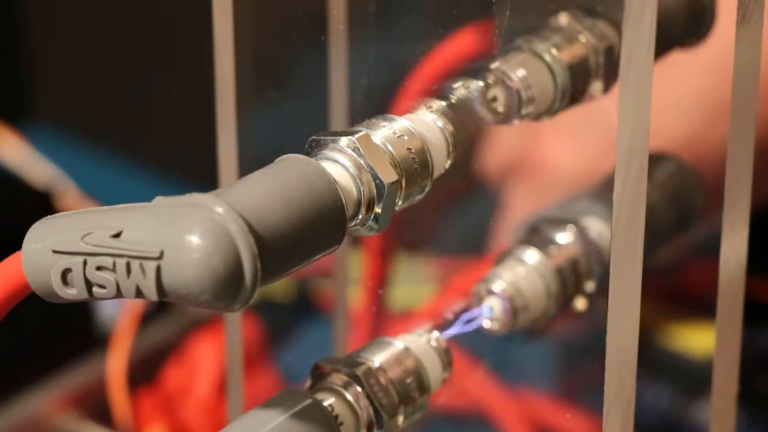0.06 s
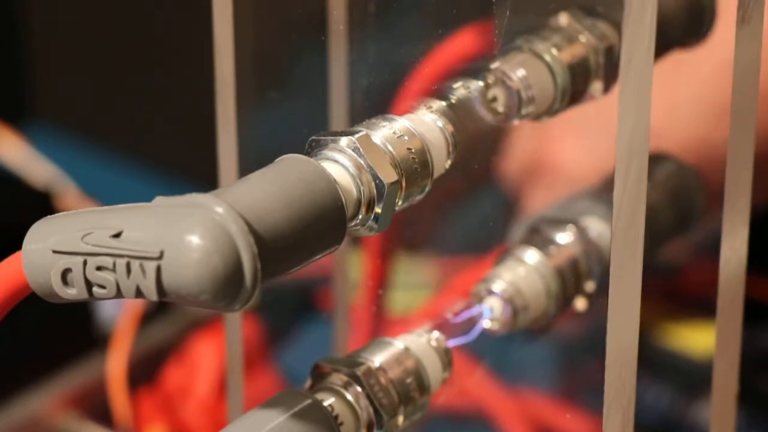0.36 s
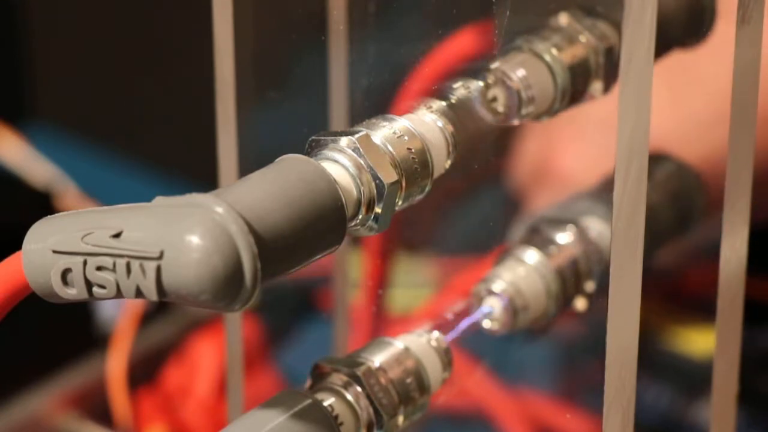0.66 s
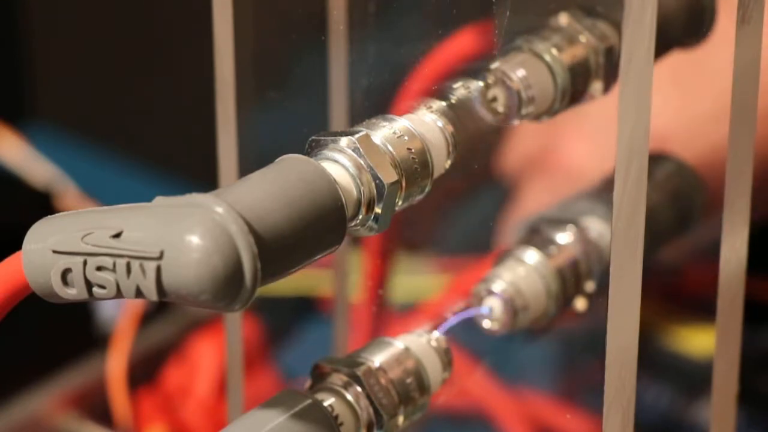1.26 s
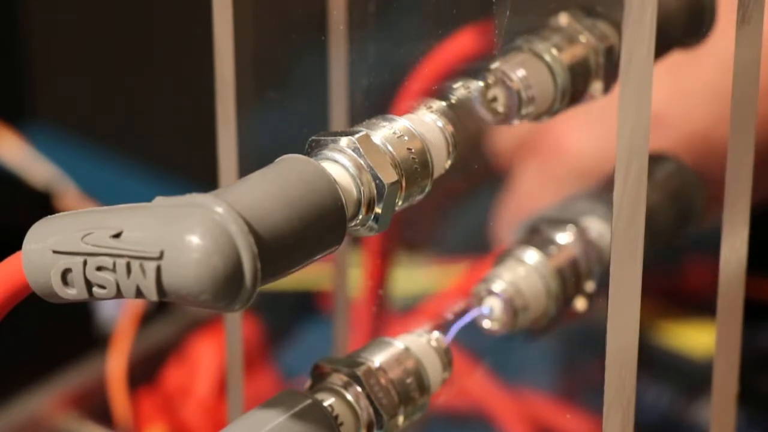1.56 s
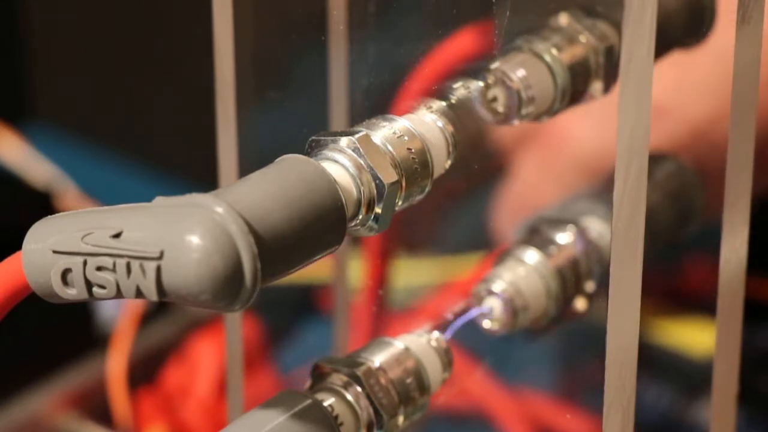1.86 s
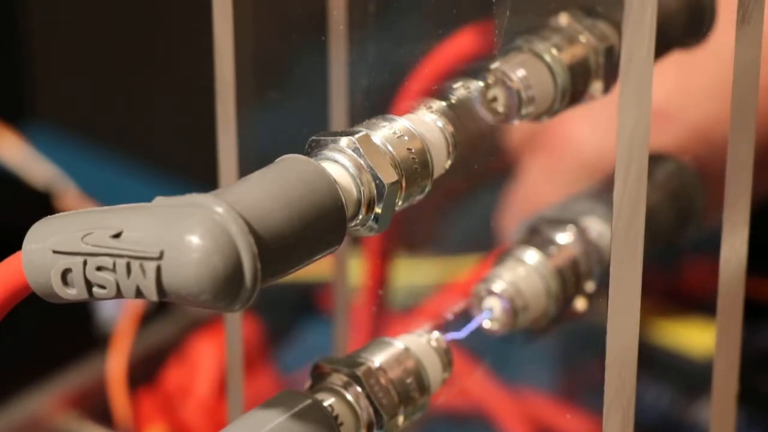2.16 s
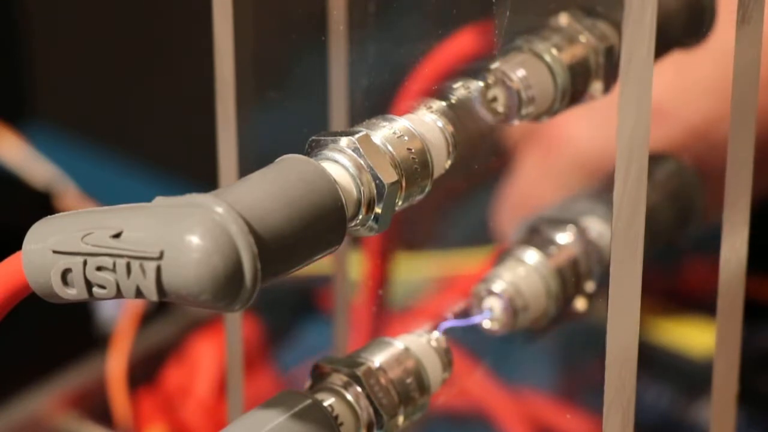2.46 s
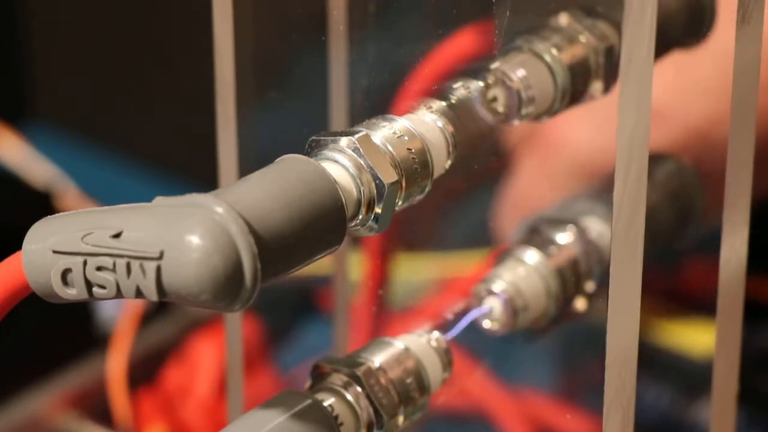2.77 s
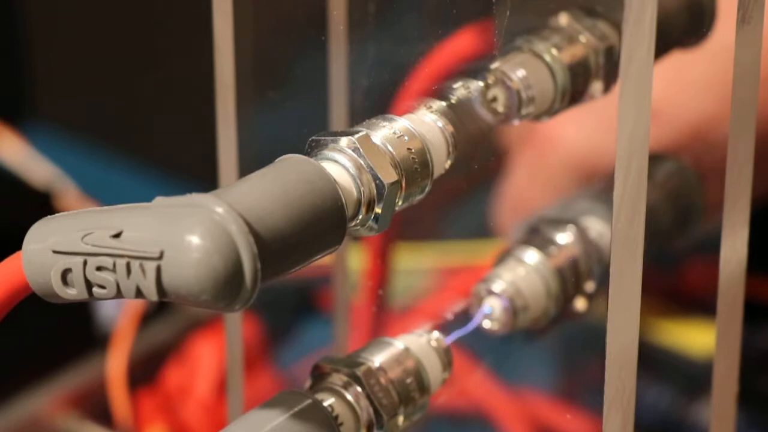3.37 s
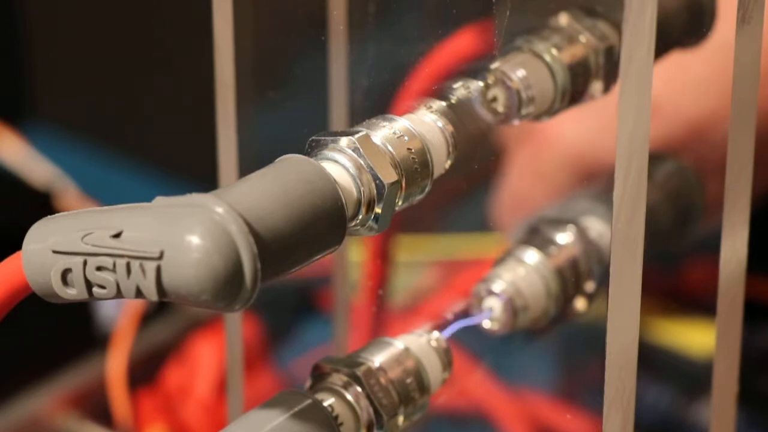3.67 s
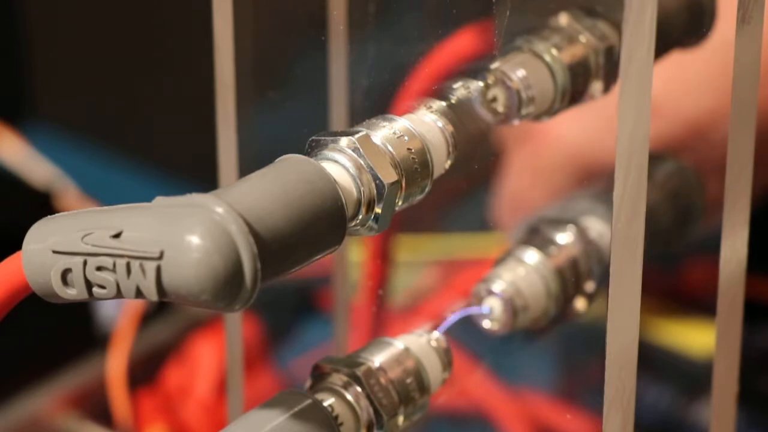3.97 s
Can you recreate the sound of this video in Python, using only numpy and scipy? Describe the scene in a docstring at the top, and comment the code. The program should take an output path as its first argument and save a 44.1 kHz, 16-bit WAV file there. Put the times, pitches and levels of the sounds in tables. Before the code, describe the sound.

A hard electric buzz of sharp, fast sparks comes from a spark plug on a test rig. Heard close and in stereo indoors, it keeps one pitch throughout, with some cracks slightly louder and very faint room noise underneath.

```python
"""A hard, crackling 50 Hz buzz: an ignition test rig firing a spark plug inside a clear plastic guard.
Each spark is one sharp shock; it reaches the close stereo microphone directly, then off the guard's
panels, then from the workshop. The arc takes a new path every time, so strength, brightness and
echoes vary. Faint room noise and the hum of the rig lie underneath."""
import sys
import numpy as np
from scipy import signal
from scipy.fft import rfft, irfft
from scipy.io import wavfile
from scipy.ndimage import uniform_filter1d

SR = 44100
rng = np.random.default_rng(int(sys.argv[2]) if len(sys.argv) > 2 else 0)


def to_wav(sig):
    """Store sig (one row per channel, or 1-D mono) as 16-bit WAV at the path in sys.argv[1].

    Samples outside -1..1 are clipped; the rate is SR.
    """
    pcm = np.clip(np.atleast_2d(sig), -1, 1) * 32767
    pcm = np.round(pcm).astype(np.int16)
    wavfile.write(sys.argv[1], SR, pcm.T)  # frames by channels


N = 176400
SPARK_RATE_HZ, FIRST_SPARK_S = 50.0004, .00368
RUN_IN_S = .5  # earlier sparks fill the reverberation
TRACK_SAMPLES = N + SR
FILTER_GRID_HZ = np.fft.rfftfreq(4096, 1 / SR)


def from_db(db):
    """Decibels to gain."""
    return 10 ** (np.asarray(db) / 20)


def db_at(table, hz, column=1):
    """One column of a spectrum table, interpolated over log frequency."""
    rows = np.array(table)
    return np.interp(np.log(hz + 1), np.log(rows[:, 0]), rows[:, column])


def minimum_phase(gain):
    """Causal impulse response with the given gains."""
    cepstrum = irfft(np.log(gain + 1e-9))
    half = len(cepstrum) // 2
    cepstrum[1:half] *= 2
    cepstrum[half + 1:] = 0
    return irfft(np.exp(rfft(cepstrum)))[:half]


def pulse_train(times, spectra, hz, lead_samples=128):
    """One short pulse per spectrum, timed between samples; the track starts with the run-in."""
    position = (times + RUN_IN_S) * SR
    offset = position % 1 + lead_samples
    pulses = irfft(spectra * np.exp(-2j * np.pi * hz * offset[:, None] / SR))
    track = np.zeros(TRACK_SAMPLES)
    for start, pulse in zip(position.astype(int) - lead_samples, pulses):
        track[start:start + len(pulse)] += pulse
    return track


# Workshop noise spectrum: (frequency [Hz], relative density [dB])
NOISE_SPECTRUM = [(20, -12), (50, -11), (100, -1), (160, -0.5), (350, 2), (700, -22), (3000, -33),
                  (16000, -35)]

def workshop_noise(mid_rms_db=-71.5, side_ratio_db=-10):
    """Low background noise, mostly common to both channels."""
    shape = from_db(db_at(NOISE_SPECTRUM, np.fft.rfftfreq(N, 1 / SR)))
    noise = irfft(rfft(rng.standard_normal((2, N))) * shape, N)
    mid, side = from_db(mid_rms_db) * noise / noise.std()
    return mid + from_db(side_ratio_db) * np.array([side, -side])


def rig_hum(hz=244.6, rms_db=-72):
    """The rig's faint steady tone."""
    return from_db(rms_db) * np.sqrt(2) * np.sin(2 * np.pi * hz * np.arange(N) / SR)


def diffuse_tail(t60_s, build_s):
    """Dense echoes that build up and die away; unit energy."""
    t = np.arange(SR // 2) / SR
    build_up = 1 - np.exp(-(t / build_s) ** 2)
    tail = rng.standard_normal(len(t)) * build_up * from_db(-60 * t / t60_s)
    return tail / np.linalg.norm(tail)


def room_tail(cutoff_hz=8200):
    """Workshop reverberation, dulled by air and walls."""
    lowpass = signal.butter(1, cutoff_hz, fs=SR, output="sos")
    return signal.sosfilt(lowpass, diffuse_tail(t60_s=.22, build_s=.022))


def guard_tail():
    """Brief reverberation between the guard's panels."""
    return diffuse_tail(t60_s=.023, build_s=.0015)


# Colour of the changing reverberation: (frequency [Hz], gain [dB])
SHIMMER_SPECTRUM = [(100, -29.5), (250, -21.5), (450, -16), (620, -18.5), (1100, -15.5), (1300, -10.5),
                    (1550, -4.5), (1750, -14.5), (1950, -11.5), (2150, 1.5), (2800, -3.5), (3000, -0.5),
                    (3400, 0), (3850, -2), (7150, 0), (12250, 0.5), (13150, 1), (15650, -12)]

def shimmer(times, shocks, hz, tails=4, guard_ratio_db=-4, trim_db=-.6):
    """Each arc radiates in new directions and so wakes a new blend of reverberant tails."""
    blend = rng.standard_normal((len(times), tails))
    blend /= np.linalg.norm(blend, axis=1, keepdims=True)
    guard_gain = from_db(guard_ratio_db)
    reverb = np.zeros(TRACK_SAMPLES)
    for share in blend.T:
        tail = (guard_gain * guard_tail() + room_tail()) / np.hypot(1, guard_gain)
        pulses = pulse_train(times, shocks * share[:, None], hz)
        reverb += signal.fftconvolve(pulses, tail)[:TRACK_SAMPLES]
    colour = from_db(trim_db + db_at(SHIMMER_SPECTRUM, FILTER_GRID_HZ))
    return signal.fftconvolve(reverb, minimum_phase(colour))[:TRACK_SAMPLES]


def stereo_shimmer(times, shocks, hz, alike_below_hz=900):
    """Changing reverberation: alike at both microphones in the bass, unrelated in the treble."""
    mid, side = shimmer(times, shocks, hz), shimmer(times, shocks, hz)
    side = signal.sosfilt(signal.butter(1, alike_below_hz, "high", fs=SR, output="sos"), side)
    return np.array([mid + side, mid - side]) / np.sqrt(2)


def steady_scatter(guard_db=-2.5, room_db=-4, cutoff_hz=933):
    """Dense echoes, the same for every spark; long waves are hardly scattered."""
    tail = from_db(guard_db) * guard_tail() + from_db(room_db) * room_tail()
    return signal.sosfilt(signal.butter(2, cutoff_hz, "high", fs=SR, output="sos"), tail)


# Peaks and dips of a spark in the guard: (frequency [Hz], left gain [dB], right gain [dB])
GUARD_SPECTRUM = [(100, -37.0, -35.3), (250, -18.7, -16.9), (500, -14.6, -12.9), (650, -20.9, -19.1),
                  (750, -5.3, -3.5), (850, -10.4, -8.6), (900, -4.8, -3.1), (950, -12.3, -10.6),
                  (1000, -5.0, -3.2), (1100, -2.3, -0.8), (1150, 4.4, -6.9), (1200, 5.9, 2.6),
                  (1250, 8.5, 4.4), (1350, 7.3, 12.6), (1400, 0.9, 7.4), (1450, -0.8, 10.8),
                  (1550, 10.3, 12.3), (1600, -1.6, 6.3), (1650, 4.6, -7.3), (1700, -4.9, -5.1),
                  (1750, -0.4, -4.5), (1850, -6.0, 3.8), (2050, 2.8, -1.3), (2150, 11.7, 7.2),
                  (2350, 5.0, 12.9), (2450, 5.2, -1.2), (2650, 7.6, 11.3), (2800, -2.3, 14.1),
                  (3000, -5.5, 0.6), (3200, 0.1, 6.2), (3300, -1.0, -0.9), (3550, 6.5, 1.2),
                  (3850, 10.3, 12.1), (4000, 4.5, 9.5), (4350, 2.7, 13.5), (4550, 7.4, 5.5),
                  (4850, 4.2, 3.1), (5050, 2.1, 13.2), (5250, 8.6, 12.1), (6250, 3.0, 2.4),
                  (6650, 4.3, 11.7), (6750, -1.1, 7.4), (7050, 9.6, 5.9), (7350, 4.2, 2.0),
                  (7850, 2.4, 8.5), (8350, 3.1, 0.9), (8850, 5.4, 6.1), (9450, -2.8, 1.0), (9850, 5.6, 5.0),
                  (10350, -2.2, 0.3), (12350, -2.4, 0.1), (13150, -7.0, -6.2), (13350, -1.0, -3.9),
                  (14050, -6.3, -6.9), (15150, -8.8, -1.8), (15650, -1.8, 0.1)]
# Broad balance of the spark: (frequency [Hz], gain [dB])
SPARK_BALANCE = [(200, -3.5), (700, 1), (1050, 0.7), (1400, 1.17), (2100, -1), (2600, -2.5), (3400, 0.3),
                 (3900, -1.06), (4600, 0.5), (5250, 1.1), (6200, 0.15), (9000, 0.17), (12000, -1),
                 (16000, -1.5)]

def guard_colour(scatter, paths, column, uneven_above_hz=1460):
    """Filter that evens out the comb of the echoes and applies the guard's colour."""
    harmonics_hz = np.arange(0, SR // 2, round(SPARK_RATE_HZ))
    response = rfft(scatter, SR)[harmonics_hz]
    for delay_ms, db in paths:
        response += from_db(db) * np.exp(-2j * np.pi * harmonics_hz * delay_ms / 1000)
    power = abs(response) ** 2
    # Treble is evened only on average: neighbouring harmonics still differ at random.
    smoothing = harmonics_hz / np.hypot(harmonics_hz, uneven_above_hz)
    power += (uniform_filter1d(power, size=3) - power) * smoothing
    comb_gain = np.sqrt(np.interp(FILTER_GRID_HZ, harmonics_hz, power))
    colour_db = db_at(SPARK_BALANCE, FILTER_GRID_HZ) + db_at(GUARD_SPECTRUM, FILTER_GRID_HZ, column)
    return minimum_phase(from_db(colour_db) / comb_gain)


def arc_wander(paths, count, hz, jitter_s=5e-6, spread_db=1.63, beaming_hz=4040):
    """Response of the paths per spark: the bowed arc shifts each arrival and beams its treble unevenly."""
    beaming = hz / np.hypot(hz, beaming_hz)
    response = 0
    for delay_ms, db in paths:
        shift, weight = rng.standard_normal((2, count, 1))
        delay_s = delay_ms / 1000 + jitter_s * shift
        gain = from_db(db + spread_db * weight * beaming)
        response = response + gain * np.exp(-2j * np.pi * hz * delay_s)
    return response


# Passing treble peaks: (centre time [s], half length [s], frequency [Hz], boost [dB])
TREBLE_GLINTS = [(.3, 0.54, 10870, 5), (1.15, 0.6, 10470, 7)]

def glints_db(times, hz, half_width_hz=330):
    """Narrow treble peaks that swell and fade across the sparks."""
    return sum(db * np.exp(-((times[:, None] - centre_s) / half_s) ** 2
                           - ((hz - centre_hz) / half_width_hz) ** 2)
               for centre_s, half_s, centre_hz, db in TREBLE_GLINTS)


# Spark strength: (time [s], level [dB])
SPARK_LEVEL = [(0, 0.7), (.9, 1), (1.3, 0.4), (4, 0)]
# Spark brightness: (time [s], tilt at 10 kHz [dB])
SPARK_TILT = [(0, -0.8), (.9, -1.2), (1.3, -1), (4, -1)]
# Sparks that crack louder: (time [s], extra level [dB])
LOUD_SPARKS = [(0.084, 1.4), (0.144, 2.7), (0.164, 1.7), (0.344, 2.0), (0.544, 1.3), (0.824, 1.2),
               (1.084, 1.5), (1.404, 1.2), (1.764, 1.5), (1.924, 1.6), (2.584, 2.1), (3.024, 1.1),
               (3.104, 1.1), (3.244, 1.3), (3.324, 1.4), (3.584, 1.6), (3.604, 1.2), (3.884, 1.5)]

def sparks(hz, level_spread_db=.5, tilt_spread_db=1.22):
    """Time and spectrum of every shock: strictly regular, uneven in strength and brightness."""
    index = np.arange(-int(RUN_IN_S * SPARK_RATE_HZ), int(N / SR * SPARK_RATE_HZ))
    times = FIRST_SPARK_S + index / SPARK_RATE_HZ
    level_draw, tilt_draw = rng.standard_normal((len(times), 2)).T
    extra_db = level_spread_db * level_draw
    for time_s, db in LOUD_SPARKS:
        extra_db[np.argmin(abs(times - time_s))] = db
    level_db = np.interp(times, *np.transpose(SPARK_LEVEL)) + extra_db
    tilt_db = np.interp(times, *np.transpose(SPARK_TILT)) + tilt_spread_db * tilt_draw
    return times, from_db(level_db[:, None] + tilt_db[:, None] * hz / 10000 + glints_db(times, hz))


# Direct sound, then panel echoes, per microphone: (delay [ms], relative level [dB])
LEFT_PATHS = [(.03, -2), (1.05, -12), (1.43, -8.5), (1.83, -10), (2.04, -4.5), (2.24, -8.5), (2.47, -5),
              (2.88, -6.5), (3.26, -3.5), (3.44, -8), (5.33, -3.5)]
RIGHT_PATHS = [(0, -1.2), (.72, -6), (1.31, -1.5), (1.77, -16.5), (2.13, -2), (2.42, -5.5), (2.92, -5.5),
               (3.1, -7), (3.69, -4), (5.39, -12)]

def spark_buzz(times, shocks, hz):
    """The shocks at both microphones: direct sound, panel echoes and scatter, coloured by the guard."""
    channels = []
    for column, paths in enumerate((LEFT_PATHS, RIGHT_PATHS), start=1):
        scatter = steady_scatter()
        arrivals = pulse_train(times, shocks * arc_wander(paths, len(times), hz), hz)
        scattered = signal.fftconvolve(pulse_train(times, shocks, hz), scatter)[:TRACK_SAMPLES]
        colour = guard_colour(scatter, paths, column)
        channels.append(-signal.fftconvolve(arrivals + scattered, colour)[:TRACK_SAMPLES])
    return np.array(channels)


def scene():
    """The spark train and its reverberation over workshop noise and hum."""
    hz = np.fft.rfftfreq(768, 1 / SR)
    times, shocks = sparks(hz)
    sparking = spark_buzz(times, shocks, hz) + stereo_shimmer(times, shocks, hz)
    start = int(RUN_IN_S * SR)
    return sparking[:, start:start + N] + workshop_noise() + rig_hum()


def record(dry, cutoff_hz=15870):
    """Steep low-pass on the top treble."""
    lowpass = signal.firwin(801, cutoff_hz, fs=SR, window="blackman")
    return signal.fftconvolve(dry, lowpass[None], "same", axes=1)


dry = scene()
out = record(dry)
to_wav(out)
```